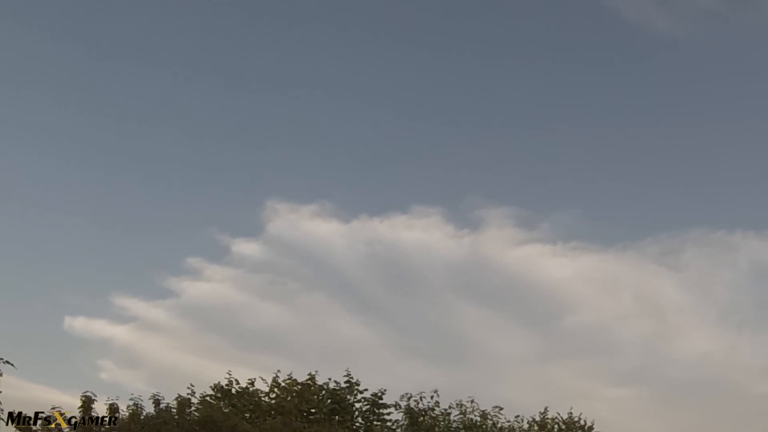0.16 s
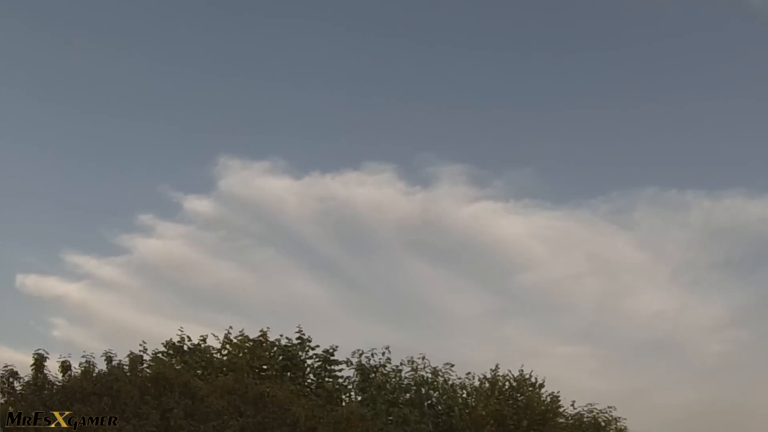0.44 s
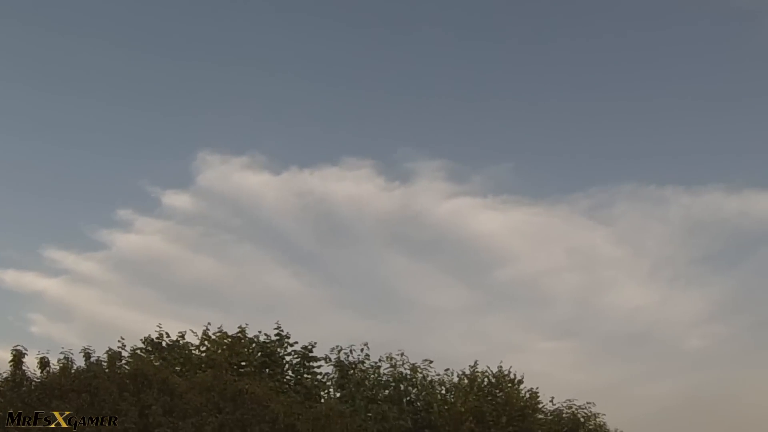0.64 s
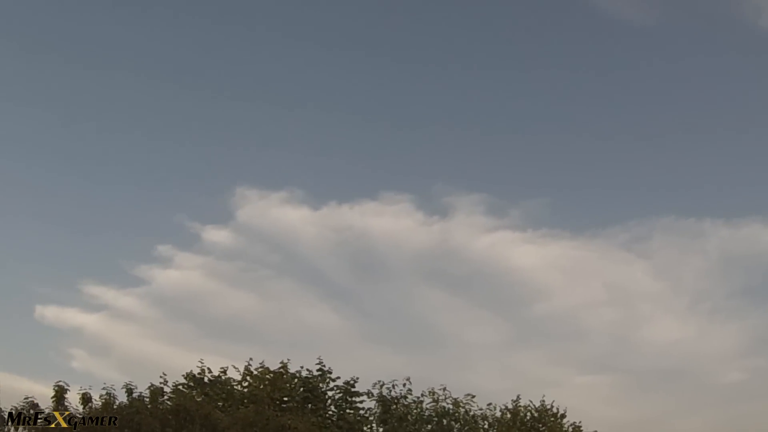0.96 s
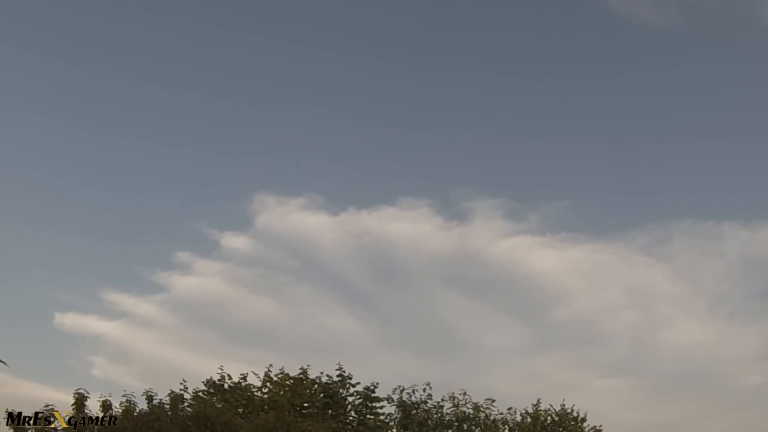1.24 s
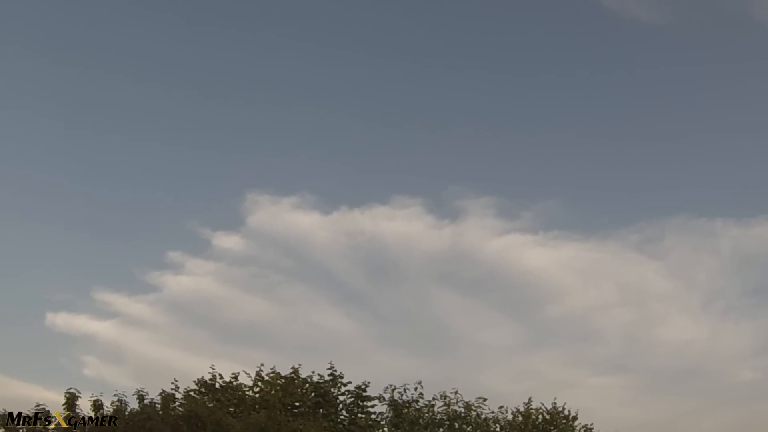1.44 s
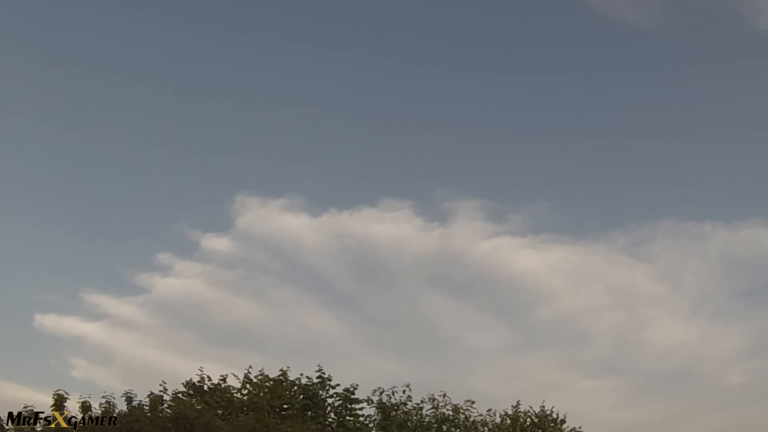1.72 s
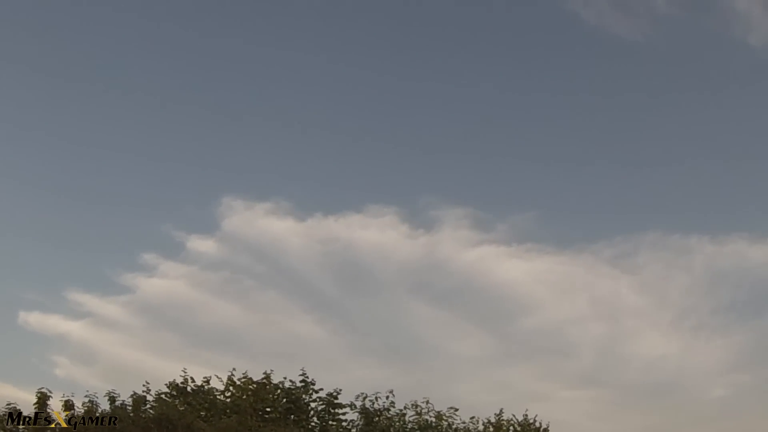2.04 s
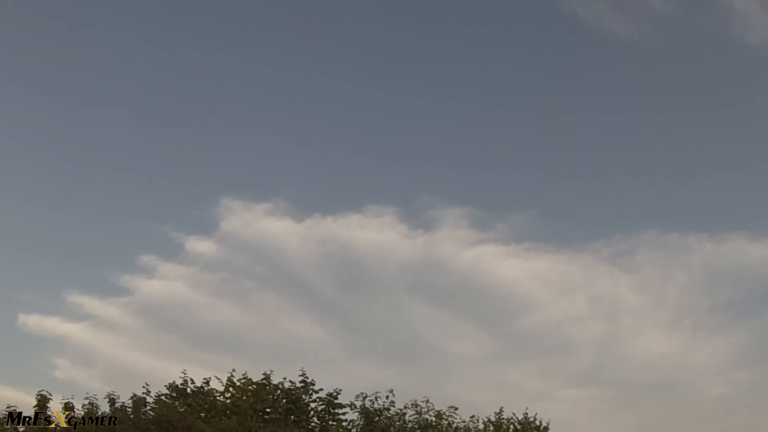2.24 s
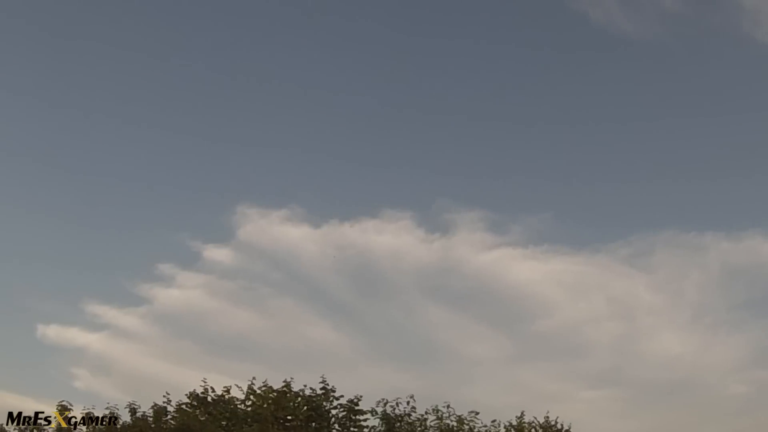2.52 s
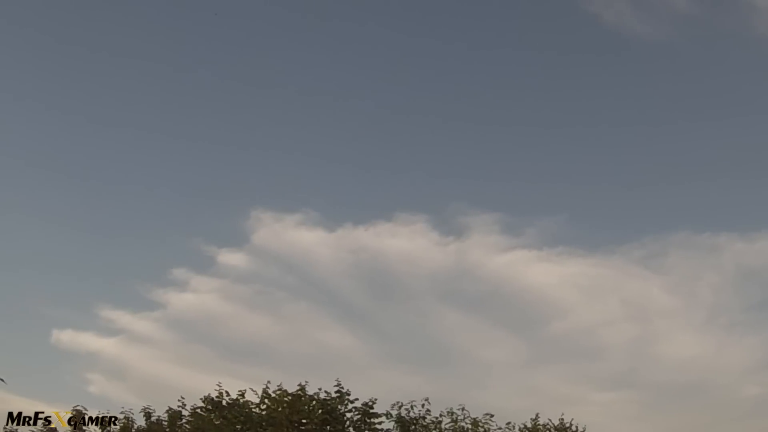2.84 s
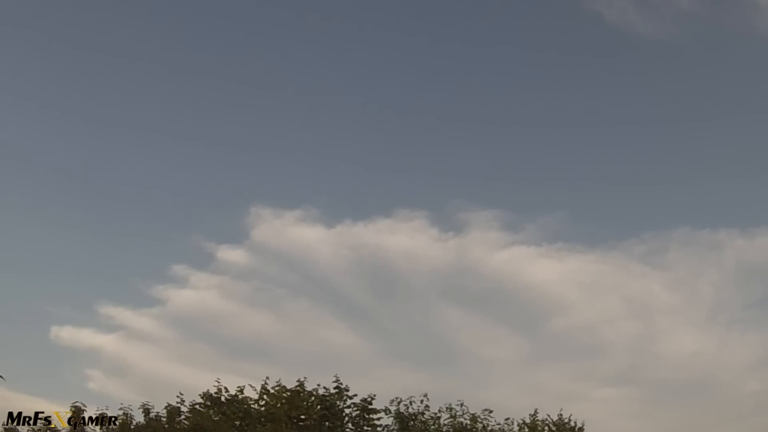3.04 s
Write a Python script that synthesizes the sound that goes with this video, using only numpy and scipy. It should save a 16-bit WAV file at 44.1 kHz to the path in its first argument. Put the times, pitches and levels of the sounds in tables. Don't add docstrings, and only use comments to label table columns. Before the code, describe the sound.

Helicopter approaches outdoors, rapid slapping rotor beats growing louder, with faint handling rustles early on

```python
import sys
import numpy as np
from scipy import signal
from scipy.fft import rfft, irfft
from scipy.io import wavfile
from scipy.ndimage import uniform_filter1d

SR = 44100
rng = np.random.default_rng(int(sys.argv[2]) if len(sys.argv) > 2 else 0)


def file_out(sig):
    cols = np.atleast_2d(sig).T
    lim = np.clip(cols, -1, 1)
    pcm = np.round(lim * 32767).astype(np.int16)
    wavfile.write(sys.argv[1], SR, pcm)


def magnitude_from_level(level_db):
    exponent = np.asarray(level_db, float) / 20
    return 10 ** exponent


N = 140238

BLADE_LEVEL = [0.71, -1.3, -0.88, -0.13]


def evened(x):
    return x / np.sqrt(np.mean(x ** 2) + 1e-20)


def smoothed(draw, first, second):
    once = uniform_filter1d(draw, size=first, axis=0)
    return evened(uniform_filter1d(once, size=second, axis=1 if second > 3 else 0))


def curve(points):
    s, value = np.transpose(points)
    return np.interp(np.arange(N) / SR, s, value)


def read(points, hz):
    f, value = np.transpose(points)
    return np.interp(np.log(hz + 1), np.log(f + 1), value)


def add(mix, s, sound):
    part = mix[round(s * SR):][:len(sound)]
    part += sound[:len(part)]


def doublet(ms, width_ms, skew):
    u = ms / np.clip(width_ms, .12, .8)
    return (skew - u) * np.exp(-u ** 2 / 2)


def since(turns, at):
    index = np.floor(turns - at + .5)
    return index.astype(int) + 2, turns - at - index


def noise(spectrum, clear, patchy_db):
    frames, hz = N // 128 + 5, np.fft.rfftfreq(512, 1 / SR)
    a, b, patches = rng.standard_normal((frames, 257, 3)).T
    patches = smoothed(patches, 5, 10)
    tilt = np.interp(np.arange(frames) * 128, np.arange(N), clear)
    level_db = read(spectrum, hz)[:, None] + patchy_db * patches + hz[:, None] / 1000 * tilt
    z = (a + 1j * b) * magnitude_from_level(level_db)
    return evened(signal.istft(z, nperseg=512, noverlap=384)[1][:N])


def causal(x, spectrum, share):
    hz = abs(np.fft.fftfreq(4096, 1 / SR))
    (low_hz, low_db), top_hz = spectrum[0], spectrum[-1][0]
    points = [(low_hz * 0.71, low_db * share), *spectrum, (2 * top_hz, 0)]
    log_gain = np.log(magnitude_from_level(read(points, hz)))
    taps = np.fft.ifft(np.exp(np.conj(signal.hilbert(log_gain)))).real[:2048]
    return signal.oaconvolve(x, taps)[:N]


def blades(count):
    return smoothed(rng.standard_normal((40, 4, count)), 3, 3).reshape(160, count)


def slap(turns, rate, near):
    # (place in pass [0-1], width [ms], level [dB], wander [ms], growth with nearness [dB/dB])
    vortices = [
        (.62, 0.42, -30.5, 0.56, 1.1),
        (.71, 0.21, -15.5, .3, 1.3),
        (.75, 0.51, -13.5, .1, 2.3),
        (.795, 0.25, -10.5, 0.22, 0.82),
        (.822, 0.21, -11.5, 0.23, 1.1),
        (.838, 0.47, -14, 0.12, 2.38),
        (.865, 0.31, -14.5, 0.21, 2.4),
        (.925, 0.42, -14.5, 0.22, 1.9),
    ]
    # (time [s], level per width [dB/ms])
    loading = [(0, 0.5), (.8, 0), (1.6, -.5), (2.2, -1), (2.6, 2), (2.9, 2.5), (3.18, 1.5)]
    shift, size, chance = blades(count=8), blades(count=8), rng.standard_normal((160, 8, 2))
    turns = turns + 0.011 * (np.arange(N) / SR - 2)
    out = np.zeros(N)
    for k, (at, width_ms, db, wander_ms, grow) in enumerate(vortices):
        index, part = since(turns, at)
        late_ms = wander_ms * shift[:, k] + .035 * chance[:, k, 0]
        ms = part * 1000 / rate - late_ms[index]
        level_db = db + np.tile(BLADE_LEVEL, 40) + 2.2 * size[:, k] + 1.0 * chance[:, k, 1]
        gain = magnitude_from_level(level_db[index] + grow * near + width_ms * curve(loading))
        out -= gain * doublet(ms, width_ms, skew=0.069)
    return out


def tail_rotor(turns, rate, near):
    # (delay [ms], level [dB], width [ms])
    tail_echoes = [
        (3.7, -8.5, 0.46),
        (6.9, -19.5, 0.68),
        (9.6, -16.5, 0.17),
    ]
    gear = 2.82894
    out = 0
    for delay_ms, db, width_ms in [(0, 0.0027, 0.59), *tail_echoes]:
        part = since(gear * (turns - delay_ms * rate / 1000), 0.6817)[1]
        out = out + magnitude_from_level(db) * doublet(part * 1000 / (gear * rate), width_ms, skew=0.1)
    return magnitude_from_level(-12.5 + 0.93 * near) * out


def thump(turns, near):
    # (multiple of blade rate [1], level [dB])
    thump_tones = [(1, -26), (2, -34), (3, -58), (4, -44), (5, -47.5)]
    tones = sum(magnitude_from_level(db) * np.cos(2 * np.pi * k * turns + 1.0) for k, db in thump_tones)
    return magnitude_from_level(0.15 * near) * tones


def turbulence(turns, rate, near):
    # (frequency [Hz], level [dB per Hz])
    wash = [(30, -12.5), (110, -11), (300, -0.5), (1100, -10.5), (2000, -15.5), (4500, -37), (7000, -51.5),
            (12000, -85.5)]
    # (frequency [Hz], level [dB per Hz])
    puff = [(100, -23), (300, -0.5), (700, -13), (1200, 2), (2000, -6.5), (4000, -24), (6500, -47),
            (11000, -79)]
    # (time [s], treble [dB per kHz])
    clearness = [(0, -1.37), (.6, 0.3), (1.2, -0.6), (1.8, -0.27), (2.3, 0.02), (2.7, 0.56), (3.18, 1.2)]
    rise_ms, fall_ms = 1.56, 14
    index, part = since(turns, 0.765)
    ms = part * 1000 / rate
    gate = np.where(ms < 0, np.exp(-(ms / rise_ms) ** 2 / 2), np.exp(-abs(ms) / fall_ms))
    blade_db = 1 * rng.standard_normal(160) + np.tile(BLADE_LEVEL, 40)
    gate = evened(gate * np.cos(np.pi * part) ** 2 * magnitude_from_level(blade_db)[index])
    roar = magnitude_from_level(-31.5 + 1 * near) * noise(wash, curve(clearness), patchy_db=1.5)
    roar += magnitude_from_level(-34.5 + 1.2 * near) * gate * noise(puff, curve(clearness), patchy_db=0.0)
    return causal(roar, [(300, -4), (600, -2)], 0.97)


def jingles():
    # (frequency [Hz], decay by 60 dB [s], level [dB])
    metal = [(5650, .02, -12), (7170, .025, -9), (8230, .03, 0), (12700, .045, 0), (14700, .03, 0),
             (15200, .05, -7)]
    # (time [s], low parts [dB], middle part [dB], high parts [dB])
    knocks = [(0.087, -72, -75, -56), (.118, -83, -69, -70), (0.226, -82, -76.5, -63),
              (.272, -71, -64, -72), (.451, -52, -64, -60), (0.458, -59.5, -58, -60.5),
              (0.469, -57.5, -65, -58), (0.486, -66, -61, -44.5), (.497, -42.5, -58, -67),
              (0.506, -53, -61, -63), (.525, -68.5, -62, -68.5), (.564, -66, -72, -69.5),
              (0.585, -51, -66, -64.5), (0.594, -64, -66, -70), (.636, -65, -63, -71.5),
              (0.75, -59.5, -72, -63.5), (0.784, -89, -66, -64), (1.115, -71.5, -57, -60.5),
              (1.132, -70, -61.5, -68.5), (1.386, -64, -64, -69), (1.542, -74, -64, -67),
              (1.819, -64, -67.5, -63), (1.855, -69, -71.5, -75), (2.041, -74, -66, -60.5)]
    out, t = np.zeros(N), np.arange(4096) / SR
    for (s, low_db, mid_db, high_db), draw in zip(knocks, rng.standard_normal((len(knocks), 6, 4098))):
        levels = [low_db, low_db, low_db, mid_db, high_db, high_db]
        rattle = uniform_filter1d(uniform_filter1d(draw[:, 2:], size=50, axis=1), size=50, axis=1)
        rattle = 1 + .45 * evened(rattle)
        ring = 0
        for (f, t60, part_db), db, (a, b), shake in zip(metal, levels, draw[:, :2], rattle):
            decay = magnitude_from_level(db + part_db + 2 * a - 60 * t / t60)
            ring = ring + decay * shake * np.sin(2 * np.pi * f * (1 + .005 * b) * t)
        add(out, s, ring * np.minimum(t / .0015, 1))
    return out


def cloth_ticks():
    # (time [s], level [dB], centre [Hz])
    snags = [(.087, -57, 8000), (0.271, -52.5, 6500), (0.474, -45, 5100), (0.499, -54.5, 7050),
             (.609, -48.5, 6620), (0.75, -63, 8100), (.82, -54, 6040), (0.833, -62, 8500),
             (1.021, -60.5, 9000), (1.056, -63, 8460), (1.063, -49.5, 7460), (1.096, -59, 8200),
             (1.115, -54, 9070), (1.386, -66, 8250), (1.642, -59.5, 8100)]
    out, t, hz = np.zeros(N), np.arange(4096) / SR, np.fft.rfftfreq(4096, 1 / SR)
    for (s, db, centre_hz), draw in zip(snags, rng.standard_normal((len(snags), 4096))):
        band = np.exp(-(np.log((hz + 1) / centre_hz) / .45) ** 2)
        burst = evened(irfft(rfft(draw) * band))
        fade = np.exp(-1000 * t / 2.6) * np.minimum(t / .0006, 1)
        add(out, s, magnitude_from_level(db) * burst * fade)
    return out


def cloth_rustle():
    # (time [s], level [dB])
    movement = [
        (0, -70.5),
        (.2, -70),
        (.42, -76.5),
        (.5, -56.5),
        (.63, -77.5),
        (.85, -75.5),
        (1.15, -72),
        (1.5, -78),
        (3.18, -88.5),
    ]
    # (frequency [Hz], level [dB per Hz])
    cloth = [(800, -29.5), (2000, -2.5), (3000, 5.5), (5000, -9.5), (8000, -12.5), (12000, -18.5)]
    return magnitude_from_level(curve(movement)) * noise(cloth, np.zeros(N), patchy_db=3.5)


def microphone_hiss():
    # (frequency [Hz], level [dB per Hz])
    hiss = [(30, -15), (300, -5), (3000, 4), (7000, 1), (10000, -1.5), (13000, -10), (15500, -21)]
    return magnitude_from_level(-69.5) * noise(hiss, np.zeros(N), patchy_db=1.5)


def scene():
    # (time [s], passes [per s])
    speed = [(0.0, 29.381), (0.45, 29.232), (0.9, 29.195), (1.3, 29.259), (1.7, 29.274), (2.1, 29.178),
             (2.5, 29.121), (2.85, 29.092), (3.18, 29.111)]
    # (time [s], nearness [dB])
    nearness = [(0.0, -20.5), (0.03, -21), (0.95, -20), (1.58, -17), (3.08, -16), (3.16, -17), (3.18, -15)]
    # (frequency [Hz], gain [dB])
    ground = [(720, -2.5), (1100, 2.5), (1290, -4), (1460, -12.5), (1640, -3), (1860, -10.5), (2060, -5.5),
              (2340, -6)]
    rate, near = curve(speed), curve(nearness) + 20
    turns = np.cumsum(rate) / SR
    wake = causal(slap(turns, rate, near) + turbulence(turns, rate, near), ground, 0)
    helicopter = wake + tail_rotor(turns, rate, near) + thump(turns, near)
    handling = jingles() + cloth_ticks() + cloth_rustle()
    return (helicopter + handling + microphone_hiss())[None]


def band_limit(x):
    return signal.sosfilt(signal.butter(12, 15440, fs=SR, output="sos"), x)


def record(dry):
    cut = signal.lfilter(*signal.butter(1, 12, "high", fs=SR), dry)
    return band_limit(cut)


dry = scene()
out = record(dry)
file_out(out)
```